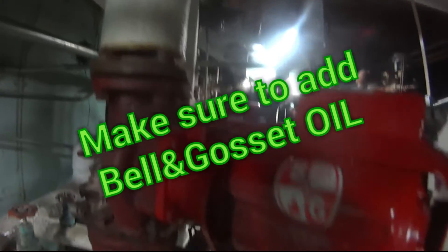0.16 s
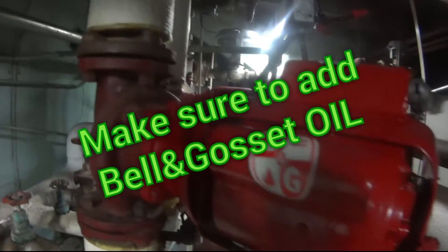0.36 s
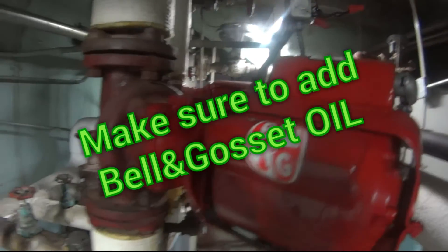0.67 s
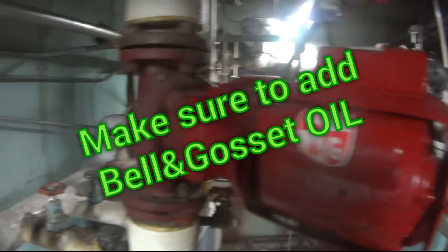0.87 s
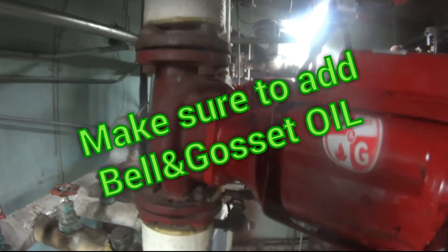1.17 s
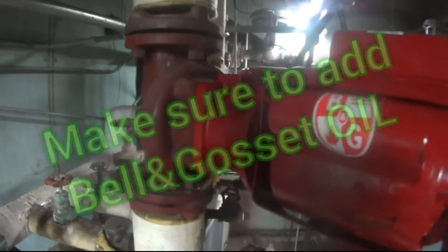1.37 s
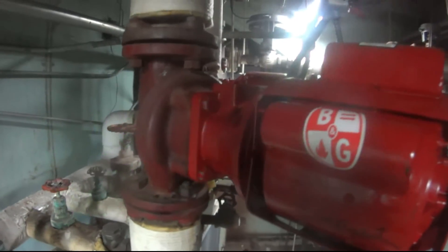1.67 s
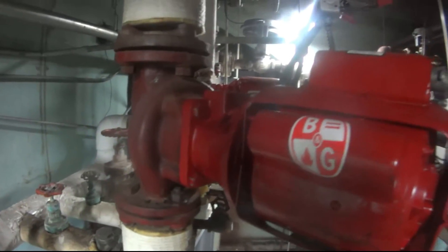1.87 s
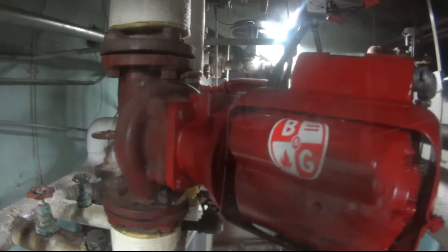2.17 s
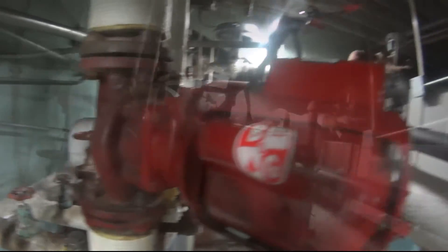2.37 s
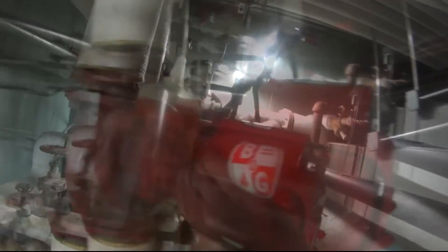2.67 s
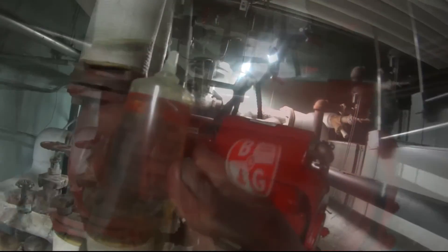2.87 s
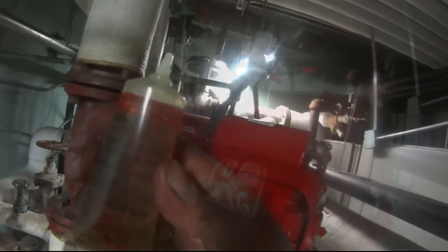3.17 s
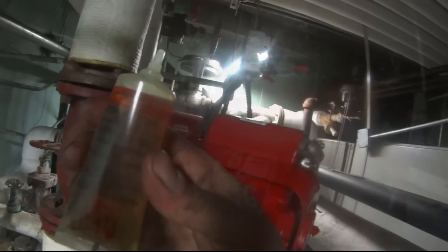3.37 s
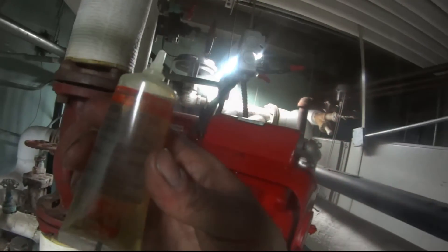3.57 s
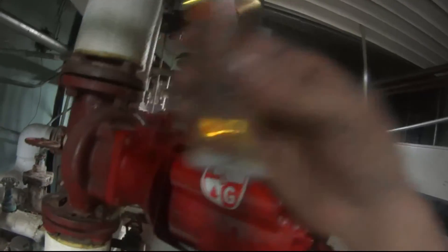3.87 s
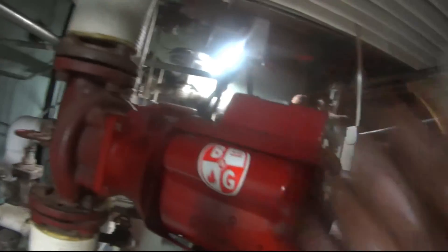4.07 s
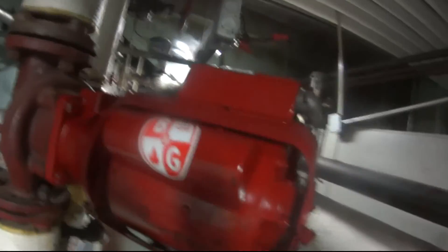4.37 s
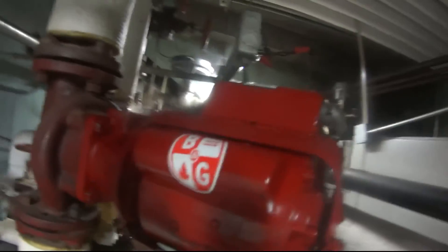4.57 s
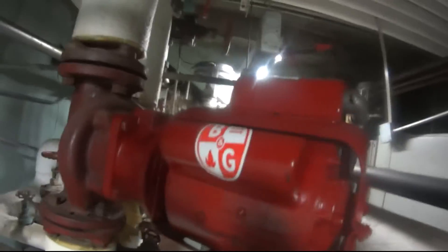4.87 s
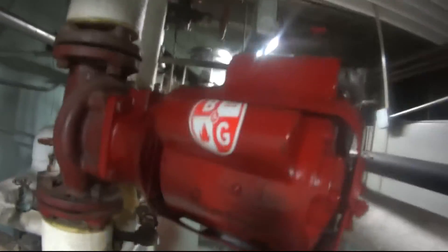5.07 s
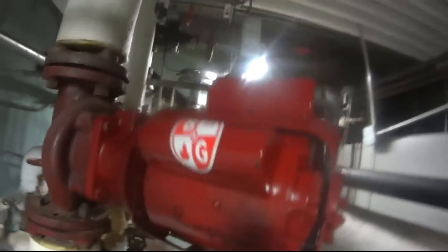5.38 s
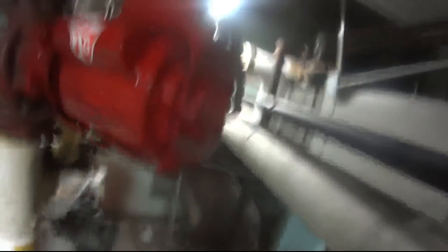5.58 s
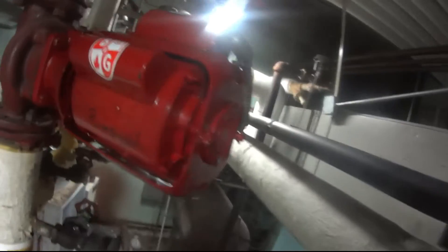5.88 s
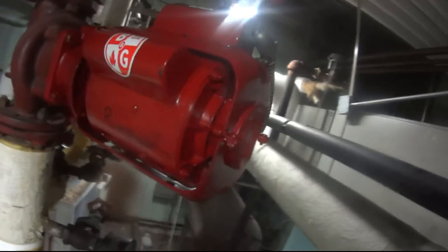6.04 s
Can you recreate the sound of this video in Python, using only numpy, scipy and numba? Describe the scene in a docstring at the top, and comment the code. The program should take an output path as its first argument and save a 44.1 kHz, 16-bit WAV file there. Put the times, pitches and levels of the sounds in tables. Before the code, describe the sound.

Steady mechanical-room hiss with thin motor whine and a pulsing ring, a few early clanks, dimming midway before hard handling knocks and scrapes.

```python
"""Circulator pumps and a handled microphone case

In a mechanical room, filtered noise makes water rush and hiss in pipes, wavering tones make motors hum
and whine, and a resonant ring throbs about three times a second. Metal clanks are noise with decaying
echoes, but for one tick, a damped swing. Fingers knock, rub and grip the hand-held case: damped swings and
grainy scrapes, coloured by its resonances. Near the end the sound drops out for an instant."""
import sys
import numpy as np
from scipy import signal
from scipy.fft import rfft, irfft
from scipy.io import wavfile
from scipy.ndimage import uniform_filter1d, minimum_filter1d
from numba import njit

SR = 44100
rng = np.random.default_rng(int(sys.argv[2]) if len(sys.argv) > 2 else 0)


def generate_wav(sig):
    """Save sig (samples, or channels by samples) to the path in sys.argv[1] as 16-bit PCM at SR."""
    pcm = np.round(np.clip(np.atleast_2d(sig).T, -1, 1) * 32767).astype(np.int16)
    wavfile.write(sys.argv[1], SR, pcm)


N = 273861
T = np.arange(N) / SR
FREQS = np.maximum(np.fft.rfftfreq(N, 1 / SR), 1)


def undb(db):
    """Logarithmic level: decibels to amplitude gain."""
    return 10 ** (np.asarray(db) / 20)


def unit(x):
    """Power normalisation: scale to rms 1."""
    return x / np.sqrt(np.mean(x ** 2))


def shape(points):
    """Spectral envelope: (frequency [Hz], level [dB]) points joined on a log-frequency axis, in dB."""
    hz, db = np.transpose(points)
    return np.interp(np.log(FREQS), np.log(hz), db)


def resonance(hz, width_hz):
    """Damped oscillator: complex response, 1 at its centre, with a half-power width."""
    return 1 / (1 + 1j * (FREQS ** 2 - hz ** 2) / (FREQS * width_hz))


def noise(gain, side_db, pan_db=0):
    """Mid-side stereo: noise of rms 1 with a given spectrum, width and place."""
    mid, side = rfft(rng.standard_normal((2, N)))
    side = side * undb(side_db)
    left = (mid + side) * undb(pan_db / 2)
    right = (mid - side) * undb(-pan_db / 2)
    return unit(irfft(gain * np.array([left, right]), N))


def band(x, low_hz, high_hz, order=2):
    """Band-pass filtering: keep the energy between two frequencies."""
    sos = signal.butter(order, [low_hz, min(high_hz, .45 * SR)], "band", fs=SR, output="sos")
    return signal.sosfilt(sos, x)


def walk(rate):
    """Slow random modulation: Gaussian low-passed noise of rms 1, changing about rate times a second."""
    return unit(irfft(rfft(rng.standard_normal(N)) * np.exp(-(FREQS / rate) ** 2), N))


def add(out, s, sound):
    """Superposition: mix a short sound in at time s."""
    start = max(int(s * SR), 0)
    out[:, start:start + sound.shape[-1]] += sound[..., :N - start]


# spectrum of water rushing through pipes and valves: (frequency [Hz], relative level per Hz [dB])
FLOW_SPECTRUM = [(25, -16), (70, -13.5), (180, -13), (370, -15), (540, -20.5), (650, -17), (1080, -15.5),
                 (1900, -7.5), (2750, -10), (4000, -8), (5400, -1.5), (8400, -8), (9400, -1.5), (11200, -7)]
# resonances of the pipework: (frequency [Hz], width [Hz], lift [dB])
PIPE_RESONANCES = [(120.5, 16, 8), (934, 25, 9), (1461, 240, 9.5), (1965, 83, 4), (2165, 280, 6.5),
                   (3154, 88, 3.5), (4147, 310, 3.5)]
# stereo width of the flow: (frequency [Hz], side minus mid [dB])
FLOW_WIDTH = [(60, -7), (110, -11), (340, -4), (600, -1.5), (1080, -2), (1920, -4.5), (6100, -6.5),
              (10900, -5)]
# stereo place of the flow: (frequency [Hz], left minus right [dB])
FLOW_PLACE = [(110, 2), (340, 0.5), (900, -3), (3400, -2.5), (10900, 0.5)]


def flow(rush_db=-31.5, hiss_db=-37, flutter_db=1.1):
    """Turbulence noise, coloured by pipe resonances; returns the rush and the high hiss above it."""
    lift = sum(db * abs(resonance(hz, width)) ** 2 for hz, width, db in PIPE_RESONANCES)
    colour = undb(shape(FLOW_SPECTRUM) + lift)
    # share of the power that goes to the hiss, half at 3500 Hz
    high = 1 / (1 + (3500 / FREQS) ** 4)
    width, place = shape(FLOW_WIDTH), shape(FLOW_PLACE)
    rush = noise(colour * np.sqrt(1 - high), width, place)
    hiss = noise(colour * np.sqrt(high), width, place)
    return rush * undb(rush_db + flutter_db * walk(5.7)), hiss * undb(hiss_db + flutter_db * walk(20))


# steady tones of the motors: (frequency [Hz], rms level at the reference distance [dB])
MOTOR_TONES = [(118.4, -55.5), (721.4, -65.5), (946.5, -54), (1454, -45.5), (1492, -53), (1916, -49.5),
               (1992, -51.5), (2163.5, -50), (2805.5, -56), (3138, -55.5), (4640, -61), (4748, -49)]


def motors(waver_hz=0.97, scatter=0.19):
    """Standing waves: each wavering tone swells differently at the two microphones."""
    out = np.zeros((2, N))
    knots = np.arange(0, T[-1] + 1, 1 / 4)  # [s]
    for hz, db in MOTOR_TONES:
        phase = 2 * np.pi * np.cumsum(hz + waver_hz * walk(4.96)) / SR
        tone = np.exp(1j * phase)
        for side in range(2):
            random_field = rng.standard_normal(len(knots)) + 1j * rng.standard_normal(len(knots))
            field = np.interp(T, knots, 1 + scatter * random_field)
            out[side] += undb(db) * unit((tone * field).real)
    return out


def throb(rate_hz=3.125, first_s=0.362, resumed_s=6.2, ring_hz=4810, width_hz=460, ring_db=-37.5,
          edge=1.65, skew=0.46):
    """Friction-driven resonance: a turning part rubs for over half a round, catches fast, lets go slowly."""
    # the rounds take a new phase within the dropout, once it is at its deepest
    anchor_s = np.where(T < DROPOUT[5][0], first_s, resumed_s)
    angle = 2 * np.pi * rate_hz * (T - anchor_s)
    skewed_turn = np.cos(angle + skew * np.cos(angle))
    contact = .5 + .5 * np.tanh(edge * (skewed_turn + 0.43))
    airy_ring = noise(resonance(ring_hz, width_hz) ** 2, -31, -2.4)
    return airy_ring * contact * undb(ring_db + 2.2 * walk(26))


# metal clanks in the room: (time [s], strike level before the common trim [dB], echo re strike [dB])
CLANK_STRIKES = [(.653, -26, -3), (0.6696, -17, 1.5), (0.6823, -18.5, -4), (.715, -33, -2),
                 (1.012, -25.5, -2), (1.067, -30, 0)]
# their colour: (frequency [Hz], relative level per Hz [dB])
CLANK_SPECTRUM = [(300, -51), (750, -15.5), (1400, 0.5), (2100, 8.5), (3200, -4), (5300, -4.5), (8000, -17),
                  (11000, -17.5)]


def clanks(strike_s=0.0047, early_s=0.046, room_t60_s=0.98, late_db=-8, grain_db=4.0, trim_db=-2.5):
    """Room impulse response: a hard strike, uneven early echoes off nearby walls, then the room's tail."""
    # powers, hence the doubled decibels and decay rates
    power = np.zeros(N)
    reflections = undb(2 * grain_db * walk(330))
    for s, db, echo_db in CLANK_STRIKES:
        age = np.maximum(T - s, 0)
        strike = np.exp(-2 * age / strike_s)
        early = reflections * np.exp(-2 * age / early_s)
        late = undb(2 * late_db) * np.exp(-2 * np.log(1000) * age / room_t60_s)
        power += (T >= s) * undb(2 * db) * (strike + undb(2 * echo_db) * (early + late))
    return noise(undb(shape(CLANK_SPECTRUM)), -7.0, -2.8) * np.sqrt(power) * undb(trim_db)


# how the case carries a touch to the microphones: (frequency [Hz], gain [dB])
CASE_RESPONSE = [(35, 4.5), (150, 2), (350, -0.5), (600, 0.5), (1000, 2.5), (1750, 2), (2150, 3.5),
                 (2400, 1.5), (2650, -4.5), (3350, 1), (4300, -3), (5600, 5.5), (11000, -8.5)]


def through_case(x):
    """Minimum-phase transmission: the case colours a sound and rings only after its onset."""
    cepstrum = irfft(np.log(undb(shape(CASE_RESPONSE))), N)
    # folding the cepstrum onto positive times makes the response causal
    causal = cepstrum * (1 + np.sign(np.fft.fftfreq(N)))
    return irfft(rfft(x) * np.exp(rfft(causal)), N)


# a swing dies within the contact time [s] plus a share of one cycle
CONTACT_S, RING_TURNS = 0.0021, 0.44


def tap(db, hz, crunch=0.78, attack_turns=0.082, port_lag_turns=0.26, longest_lag_s=0.00093, spread=1.575):
    """Damped impact: a brief swing with a crunch; a lower pitch reaches the left later, to a limit."""
    t = np.arange(SR // 8) / SR
    left_lag_s = min(port_lag_turns / hz, longest_lag_s)
    age = np.maximum(t - np.array([[left_lag_s], [0]]), 0)
    raw = rng.standard_normal((2, len(t))) + rng.standard_normal(len(t))  # partly shared by both sides
    grit = unit(band(raw, hz / spread ** 2, hz * spread))
    attack = 1 - np.exp(-age * hz / attack_turns)
    decay = np.exp(-age / (CONTACT_S + RING_TURNS / hz))
    blow = (np.sin(2 * np.pi * hz * age) + crunch * grit) * attack * decay
    return undb(db) * blow / abs(blow).max()


def slide(s, half_s, db, top_hz, rumble_db, grain_db=3.0, low_hz=350, rumble_hz=170):
    """Stick-slip friction: a grainy scrape over a low rumble; returns its start time and sound."""
    t = np.arange(-SR // 4, SR // 4) / SR
    grip = undb(grain_db * unit(uniform_filter1d(rng.standard_normal(len(t)), SR // 300)))
    raw = rng.standard_normal((2, len(t))) + rng.standard_normal(len(t))
    scrape = unit(band(raw, low_hz, top_hz) * grip)
    rumble = unit(band(rng.standard_normal(len(t)), 41, rumble_hz))
    swell = np.exp(-(t / half_s) ** 2)
    return s + t[0], undb(db) * swell * (scrape + undb(rumble_db) * rumble)


# skin sliding on the case, levels before the case response:
# (middle [s], half length [s], scrape level [dB], bright up to [Hz], rumble re scrape [dB])
SKIN_RUBS = [(3.5, 0.19, -50.5, 1100, 0.5), (4.118, 0.2, -48.5, 1050, 1.5), (4.167, 0.041, -36, 1720, -6.5),
             (4.865, 0.12, -29.5, 1750, -5), (5.399, 0.22, -32.5, 1380, -12),
             (5.589, 0.019, -31.5, 4500, -10), (5.68, 0.055, -32.5, 1570, -8), (6.008, 0.04, -35, 3520, -8)]


def rubs():
    """Sliding friction: the hand rubs over the case."""
    out = np.zeros((2, N))
    for rub in SKIN_RUBS:
        add(out, *slide(*rub))
    return out


# bumps that set a hollow part ringing: (time [s], blow level [dB])
HOLLOW_BUMPS = [(5.305, -24.5), (5.3695, -18.5), (5.394, -34), (5.444, -31), (5.454, -25.5)]
# its modes: (frequency [Hz], relative level [dB], t60 [s])
HOLLOW_MODES = [(350, -7.5, 0.045), (645, 2.5, 0.069), (778, 1, 0.048), (915, -11, 0.034), (1440, -12, .05)]


def hollow_ring(port_lag_s=0.00037, slide_s=0.028, slide_db=-26):
    """Modal excitation: each bump slides on a little; blow and friction ring a few short, low modes."""
    out, t = np.zeros((2, N)), np.arange(SR // 3) / SR
    age = np.maximum(t - np.array([[port_lag_s], [0]]), 0)  # the left side hears it later
    ring = np.zeros((2, len(t)))
    for hz, db, t60 in HOLLOW_MODES:
        ring += undb(db) * np.sin(2 * np.pi * hz * age) * np.exp(-np.log(1000) * age / t60)
    for s, db in HOLLOW_BUMPS:
        friction = undb(slide_db) * rng.standard_normal(len(t)) * np.exp(-t / slide_s)
        force = (t == 0) + friction
        add(out, s, undb(db) * signal.fftconvolve(ring, force[None]))
    return out


# spells of fumbling: (start [s], end [s], typical tap peak before the case response [dB])
FUMBLE_SPELLS = [(3.501, 3.85, -36), (3.978, 4.3, -29.5), (5.6, 5.8, -29)]


def fumbles(taps_per_s=18, typical_hz=400, scatter_octaves=1.1, scatter_db=3):
    """Random impacts: light taps of uneven timing, strength and softness while the fingers shift."""
    out = np.zeros((2, N))
    for start, end, db in FUMBLE_SPELLS:
        slots = np.arange(start, end, 1 / taps_per_s)
        chances = rng.uniform(-1.2, 1, (len(slots), 3))
        for s, (late, force, hardness) in zip(slots, chances):
            hz = typical_hz * 2 ** (scatter_octaves * hardness)
            add(out, s + .5 * late / taps_per_s, tap(db + scatter_db * force, hz))
    return out


# short knocks by fingers on the case, the softer the pad the lower the pitch;
# the first, at 1.032 s, is a metal tick in the room:
# (time [s], peak level before the case response [dB], pitch [Hz])
SHORT_KNOCKS = [(1.032, -11, 2200), (1.9887, -11, 794), (2.008, -21.5, 600), (2.113, -29, 286),
                (3.025, -29.5, 710), (3.281, -22, 890), (3.367, -29, 517), (3.444, -25, 705),
                (3.561, -25.5, 302), (3.956, -24.5, 910), (4.161, -18.5, 300), (4.215, -17.5, 394),
                (4.7141, -4, 1210), (4.885, -5.5, 600), (4.9542, -8.5, 191), (4.9573, -8.5, 1450),
                (4.964, -6, 955), (5.226, -2, 540)]


def knocks():
    """Contact stiffness sets the pitch of each short knock: first a metal tick, then fingers on the case."""
    out = np.zeros((2, N))
    for s, db, hz in SHORT_KNOCKS:
        add(out, s, tap(db, hz))
    return out


# the hand takes a new grip, peak levels before the case response:
# (time [s], knock level [dB], knock pitch [Hz], click level [dB], squeeze level [dB])
HAND_GRIPS = [(4.7939, -20, 1500, -7.5, -16), (4.9256, -6.5, 1310, -7.5, -36), (5.2059, 3, 260, -5.5, -11),
              (5.246, -12, 396, -3.5, -24), (5.2925, -21, 1490, -3, -7.5)]
CLICK_AFTER_S, CLICK_HZ = .0058, 4010
HEAVE_AFTER_S, HEAVE_HZ = .0098, 79
# slip level is relative to the squeeze, its rumble relative to the scrape
SLIP_HALF_S, SLIP_TOP_HZ, SLIP_DB, SLIP_RUMBLE_DB = 0.015, 3350, -11.5, -4.5


def grips():
    """Contact sequence: a finger lands, the case clicks, the squeeze brings a low heave and a short slip."""
    out = np.zeros((2, N))
    for s, knock_db, hz, click_db, squeeze_db in HAND_GRIPS:
        heave_s = s + HEAVE_AFTER_S
        add(out, s, tap(knock_db, hz))
        add(out, s + CLICK_AFTER_S, tap(click_db, CLICK_HZ))
        add(out, heave_s, tap(squeeze_db, HEAVE_HZ))
        add(out, *slide(heave_s, SLIP_HALF_S, squeeze_db + SLIP_DB, SLIP_TOP_HZ, SLIP_RUMBLE_DB))
    return out


# how loud the machinery is where the case is held; only changes from the first second count:
# (time [s], level [dB])
NEARNESS = [(0, -35), (2.02, -35), (2.12, -40), (2.7, -42), (2.9, -44.5), (3.3, -46), (3.85, -44),
            (4.08, -37), (5.3, -35), (5.66, -41.5), (6.2, -36)]


def scene(hiss_reach=1.05, bass_reach=0.64, bass_db=-2, bass_hz=220):
    """Distance law: as the case moves, hiss varies most and room-filling bass least; the rest does not."""
    db = np.interp(T, *np.transpose(NEARNESS))
    # the opening second, close to the pump, sets the reference level
    near = undb(db - db[:SR].mean())
    rush, hiss = flow()
    bass = irfft(rfft(rush) / (1 + (FREQS / bass_hz) ** 4), N)
    machinery = near ** bass_reach * undb(bass_db) * bass
    machinery += near * (rush - bass + motors())
    machinery += near ** hiss_reach * (hiss + throb())
    # the metal tick among the knocks shares the case's colour
    case_sounds = rubs() + hollow_ring() + fumbles() + knocks() + grips()
    return machinery + clanks() + through_case(case_sounds)


@njit
def peak_hold(x, release):
    """Envelope following: rises with each peak at once and lets go slowly."""
    held, out = 0., np.empty(len(x))
    for i in range(len(x)):
        held = max(x[i], held * release)
        out[i] = held
    return out


# the sound fades, drops out and returns: (time [s], gain [dB])
DROPOUT = [(5.485, 0), (5.5, -9), (5.523, -12), (5.528, -27), (5.541, -32), (5.544, -60), (5.554, -60),
           (5.558, -12), (5.572, 0)]
TOP_HZ = 11150


def record(dry, ceiling=0.7, release_s=0.13):
    """Peak limiting: hard knocks duck the level; then the brief dropout and a steep cut of the top."""
    peak = peak_hold(abs(dry).max(axis=0), np.exp(-1 / (release_s * SR)))
    lowest_gain = minimum_filter1d(ceiling / np.maximum(peak, ceiling), size=45)
    gain = uniform_filter1d(lowest_gain, size=45)
    gate = undb(np.interp(T, *np.transpose(DROPOUT)))
    top_cut = signal.ellip(14, .2, 75, TOP_HZ, fs=SR, output="sos")
    return signal.sosfilt(top_cut, dry * gain * gate)


dry = scene()
out = record(dry)
generate_wav(out)
```